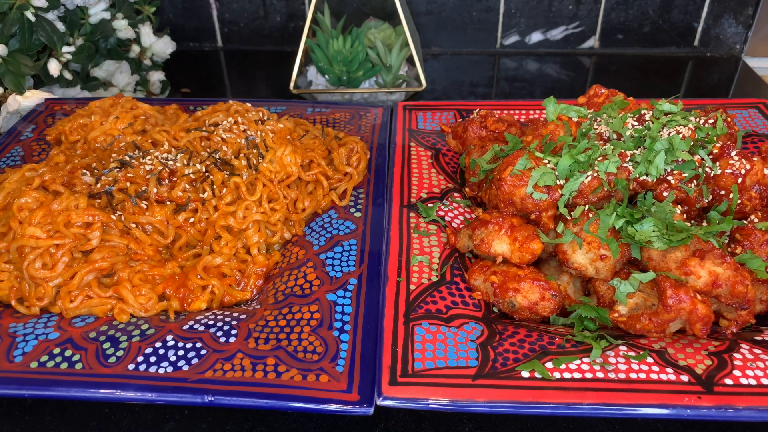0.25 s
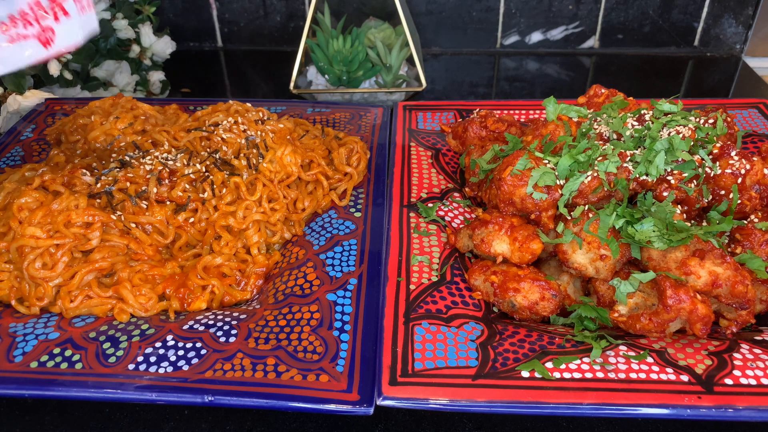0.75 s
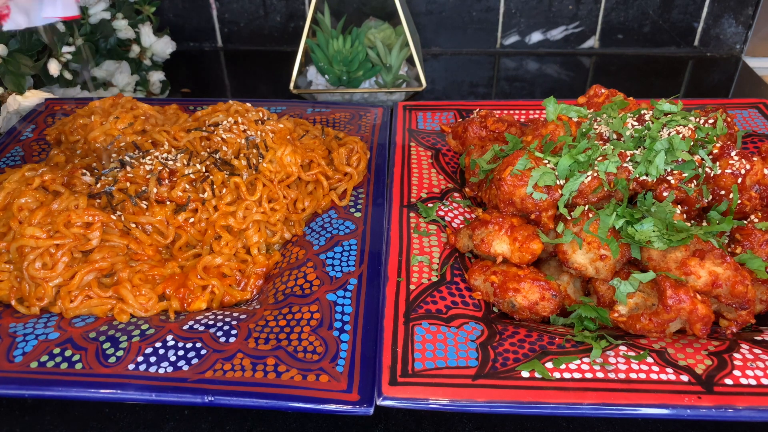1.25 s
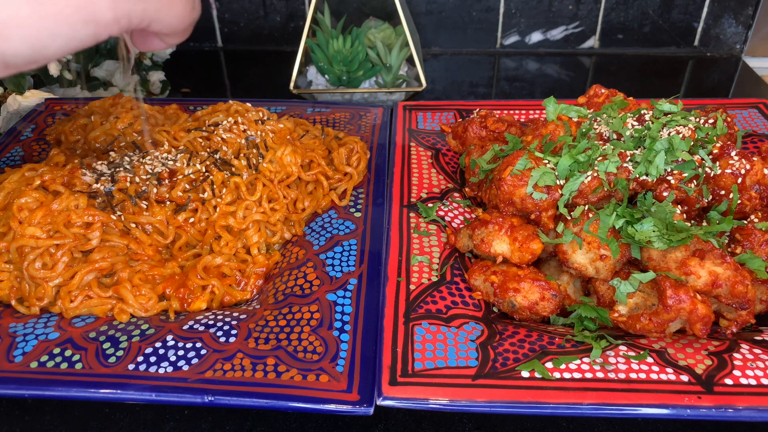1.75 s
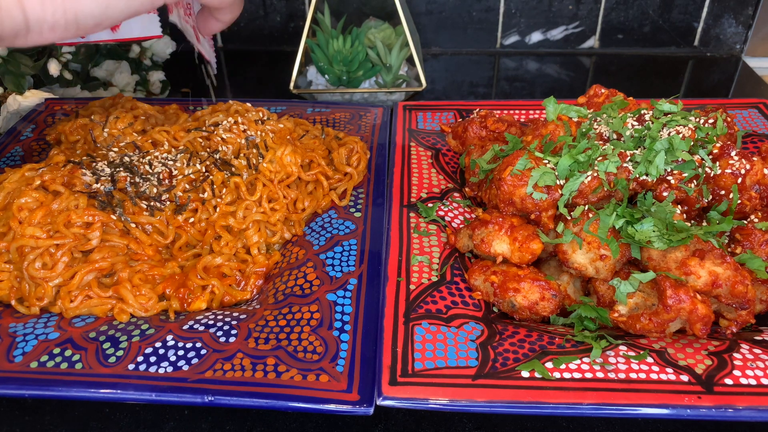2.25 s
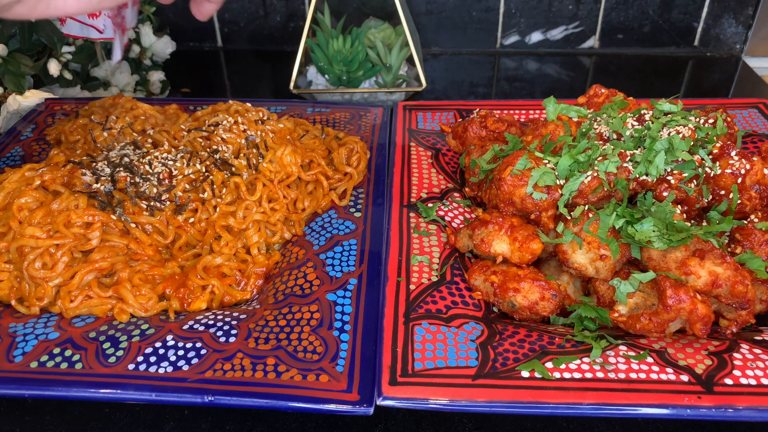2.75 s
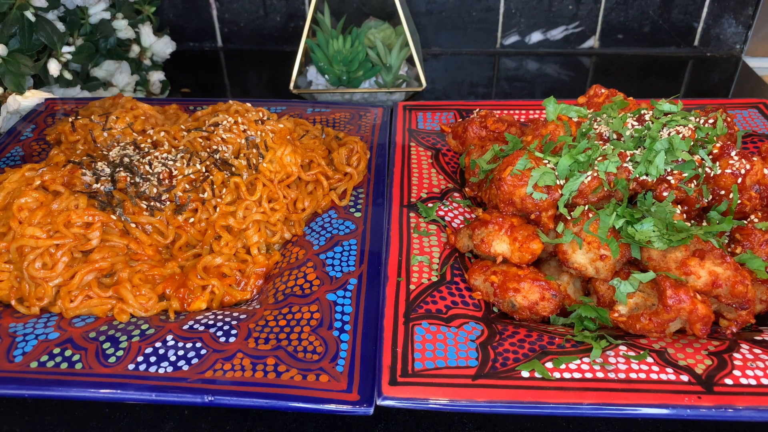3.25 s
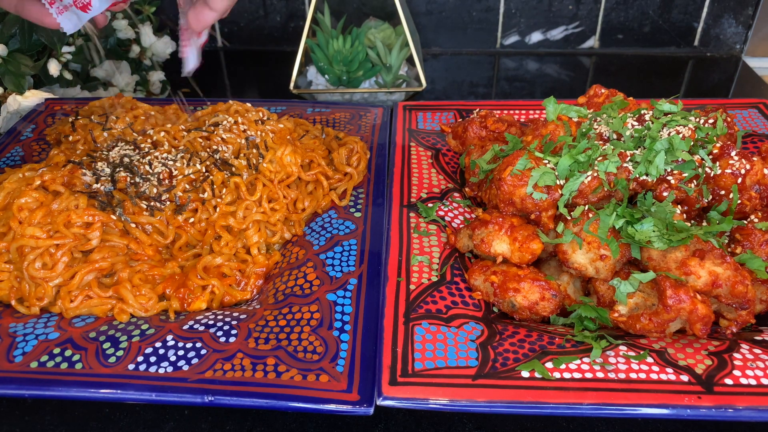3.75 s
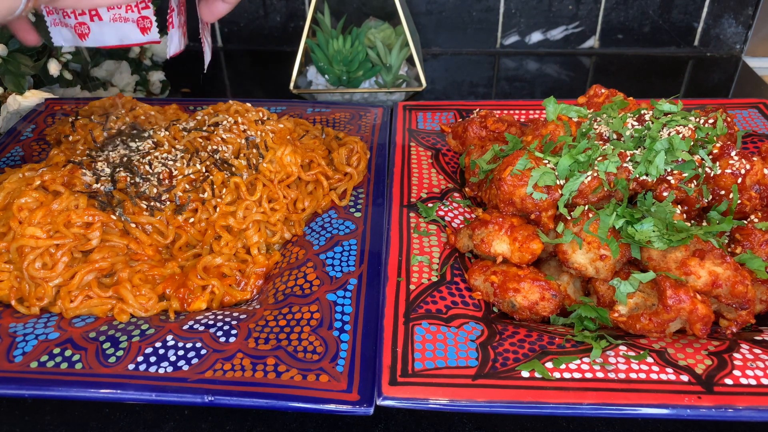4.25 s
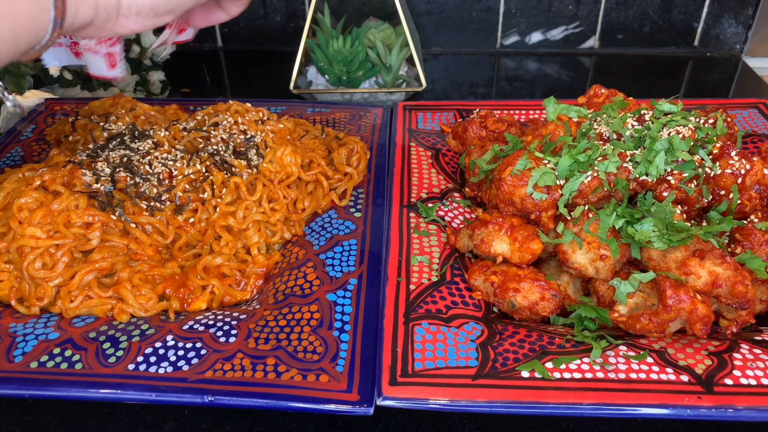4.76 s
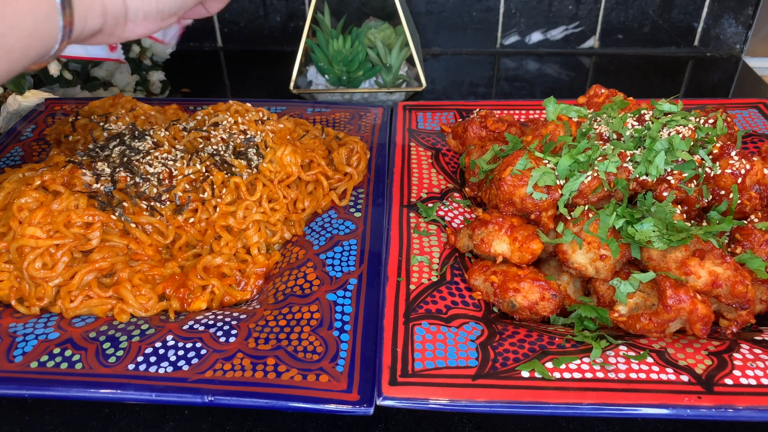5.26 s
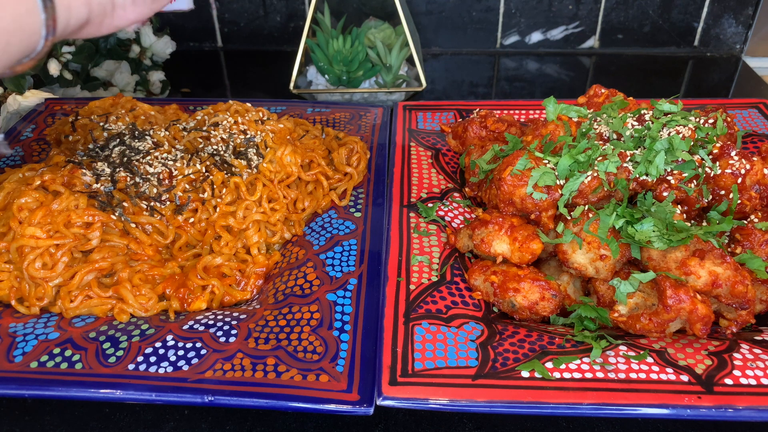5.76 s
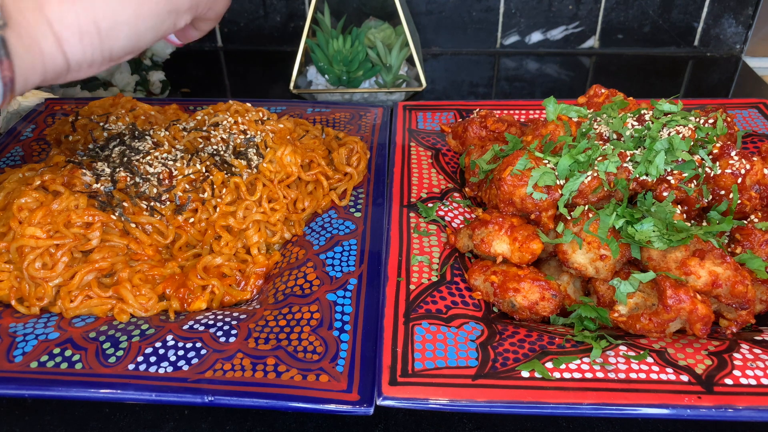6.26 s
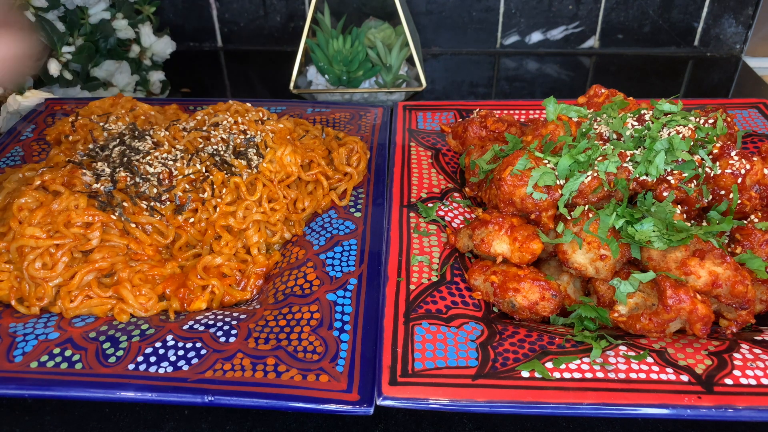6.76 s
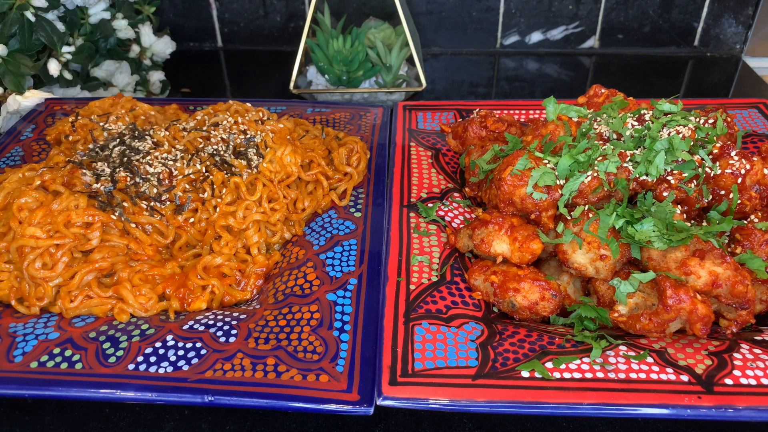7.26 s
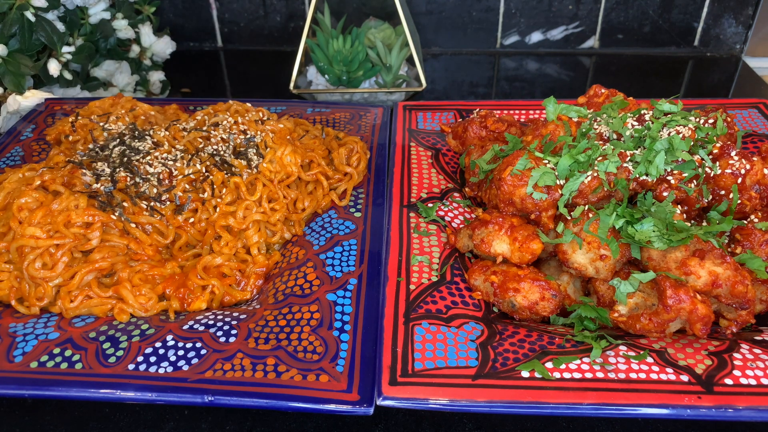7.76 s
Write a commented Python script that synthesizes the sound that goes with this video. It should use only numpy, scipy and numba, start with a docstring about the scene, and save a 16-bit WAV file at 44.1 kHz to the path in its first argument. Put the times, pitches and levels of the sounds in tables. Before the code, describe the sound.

Small plastic seasoning packets are handled close to the microphone in a tiled kitchen, with a short echo and a faint, steady fridge hum. Light crinkles start at about 0.2 seconds, followed by a brighter cluster of crackles around 1.3 seconds. From 1.5 to 3.5 seconds, scattered snaps sit on a soft, fine rustle of seeds and flakes being shaken, with a little palm rubbing. From about 3.8 seconds the squeezes come closer together and louder, in crisp, uneven bursts. The crackling is densest and sharpest between 5.3 and 6.4 seconds, with a few soft hand bumps around 6 seconds. It drops away after 6.5 seconds, then returns in one short crinkle from 7 to 7.2 seconds. A soft, low bump follows near 7.4 seconds, then faint rustling, a tiny plastic squeak and a last snap near 8 seconds.

```python
"""A tiled kitchen: small plastic seasoning packets are squeezed and shaken over the counter, near a two-port
phone. Creases in the film snap over, and each snap excites damped modes in patches of the sheet. Seeds and
small folds tick so densely that they merge into a rustle, with palm rub, soft hand bumps, low thumps under some
snaps and a few faint squeaks. The tiles return a short diffuse reverberation, and a fridge hums under it all."""
import sys
import numpy as np
from scipy import signal
from scipy.fft import rfft, irfft, next_fast_len
from scipy.io import wavfile
from scipy.ndimage import map_coordinates
from numba import njit

SR = 44100
rng = np.random.default_rng(int(sys.argv[2]) if len(sys.argv) > 2 else 0)


def bounce(signal):
    """Save signal as a 16-bit WAV file at the path given by the first command-line argument."""
    frames = np.transpose(np.atleast_2d(signal))
    limited = np.clip(frames, -1, 1)
    pcm = np.round(limited * 32767).astype(np.int16)
    wavfile.write(sys.argv[1], SR, pcm)


N = 352359


def undb(db):
    """Amplitude ratio of a level in decibels."""
    return 10 ** (np.asarray(db) / 20)


def on_log(table, hz):
    """Interpolation of (frequency, value) rows on a logarithmic frequency axis."""
    f, value = np.transpose(table)
    return np.interp(np.log(np.maximum(hz, 1)), np.log(f), value)


def shaped(x, gain):
    """Linear filtering: the spectrum is multiplied by a gain function of frequency."""
    n = next_fast_len(x.shape[-1], True)
    return irfft(rfft(x, n) * gain(np.arange(n // 2 + 1) * SR / n), n)[..., :x.shape[-1]]


def noise(gain):
    """Coloured noise: white Gaussian noise through a linear filter."""
    return shaped(rng.standard_normal(N), gain)


def unit(x):
    """Normalisation to unit RMS."""
    return x / np.sqrt(np.mean(x ** 2))


# Spectrum of the kitchen air: (frequency [Hz], relative spectral density [dB])
AIR_SPECTRUM = [(25, -61), (40, -4), (60, 2.5), (134, 6.5), (200, -3), (317, 0), (531, -16), (900, -19),
                (4250, -33.5), (9000, -49), (13500, -77)]
# Bands of the fridge hum: (centre frequency [Hz], bandwidth [Hz], level [dB])
FRIDGE_BANDS = [(47, 2.2, -66), (152.4, 24, -68)]

def air_and_fridge(air_db=-60.5):
    """Diffuse field: steady air and fridge hum are coherent at the two ports only at long wavelengths."""
    mid = noise(lambda f: undb(on_log(AIR_SPECTRUM, f)))
    side = noise(lambda f: undb(on_log(AIR_SPECTRUM, f)) * np.clip(.24 + f / 1400, 0, 1))
    air = undb(air_db) * (mid + side * np.array([[1], [-1]])) / np.std(mid)
    for hz, width, db in FRIDGE_BANDS:
        air = air + undb(db) * unit(noise(lambda f: 1 / (1 + (2 * (f - hz) / width) ** 2)))
    return air * undb([[-.6], [.6]])


# Reverberation time of the tiled room: (frequency [Hz], T60 [s])
ROOM_T60 = [(500, 0.13), (2000, 0.29), (6000, 0.28), (13000, 0.0073)]

def reverberation(x, wet_db=-13., gap_s=.002):
    """Scattering from tiles and counter gives each port its own tail, decaying exponentially by octave."""
    t = np.arange(SR // 2) / SR
    tail = 0
    for hz in 350 * 2. ** np.arange(6):
        band = shaped(rng.standard_normal((2, len(t))), lambda f: np.exp(-2 * np.log2((f + 1) / hz) ** 2))
        tail = tail + band * 10 ** (-3 * t / on_log(ROOM_T60, hz))
    tail = tail * np.clip(t / gap_s - 1, 0, 1)
    tail = tail / np.sqrt(np.sum(tail ** 2, axis=1, keepdims=True))
    return undb(wet_db) * signal.fftconvolve(x, tail, axes=1)[:, :N]


def ports(x, split_hz=1980., bass_db=2., lead_samples=9, lag_samples=13):
    """Time and level differences: at the left port the bass is early and louder, the treble late."""
    lowpass = lambda f: 1 / (1 + (f / split_hz) ** 4)
    bass = undb(bass_db) * np.roll(shaped(x[0], lowpass), -lead_samples)
    treble = np.roll(shaped(x[0], lambda f: 1 - lowpass(f)), lag_samples)
    return np.array([bass + treble, x[1]])


@njit
def damped_sines(n, start, pole, left, right, length):
    """Superposition of damped sines, each swelling over a cycle, with a complex amplitude per port."""
    out = np.zeros((2, n + 8192))
    for k in range(len(start)):
        phasor, onset_lack = 1 + 0j, 1.
        swell = np.exp(-np.angle(pole[k]) / np.pi)
        for i in range(start[k], start[k] + length[k]):
            out[0, i] += (1 - onset_lack) * (phasor * left[k]).imag
            out[1, i] += (1 - onset_lack) * (phasor * right[k]).imag
            phasor, onset_lack = phasor * pole[k], onset_lack * swell
    return out[:, :n]


# Random phase difference between the ports: (frequency [Hz], standard deviation [rad])
PHASE_SPREAD = [(500, 2.3), (1500, 0.76), (4000, 2.96), (8000, 1.87), (12000, 0.014)]

def modes(when, hz, t60, db, phase_draw):
    """Free vibration: each mode decays exponentially and reaches the left port shifted in phase."""
    when, hz, t60, db, phase_draw = map(np.ravel, np.broadcast_arrays(when, hz, t60, db, phase_draw))
    pole = np.exp(2j * np.pi * hz / SR - np.log(1000) / (t60 * SR))
    right = undb(db) + 0j
    left = right * np.exp(1j * phase_draw * on_log(PHASE_SPREAD, hz))
    start = np.clip(when * SR, 0, N - 1).astype(np.int64)
    length = np.clip(.6 * t60 * SR, 4, 8000).astype(np.int64)
    return damped_sines(N, start, pole, left, right, length)


# Faint squeaks: (centre time [s], half duration [s], frequency [Hz], glide [Hz/s],
# sag at the ends [Hz], nominal level [dB])
SQUEAK_GLIDES = [(.87, .06, 2760, -2600, 0, -68), (3.15, .13, 2890, 0, 450, -70),
                 (7.93, .09, 1630, 0, 60, -63)]

def squeaks():
    """Amplitude modulation by slow noise roughens tones that swell and fade as they glide or arch."""
    t, out = np.arange(N) / SR, 0
    for centre, half_s, hz, glide, sag, db in SQUEAK_GLIDES:
        progress = np.clip((t - centre) / half_s, -2, 2)
        roughness = 1.2 + .5 * unit(noise(lambda f: 1 / (1 + (f / 70) ** 2)))
        pitch = hz + glide * half_s * progress - sag * progress ** 2
        tone = np.sin(2 * np.pi * np.cumsum(pitch) / SR)
        out = out + undb(db) * np.exp(-progress ** 4) * roughness * tone
    return out


# Soft bumps of the hand, and low thumps under some snaps: (time [s], level before the low-pass [dB],
# fundamental [Hz], T60 [s])
SOFT_BUMPS = [(.257, -49, 520, 0.033), (5.864, -38, 279, 0.057), (6.097, -43.5, 257, 0.096),
              (6.216, -39, 520, 0.027), (6.276, -44, 564, .025), (7.39, -47, 135.3, 0.29)]

def soft_bumps(corner_hz=700):
    """A soft impact acts as a low-pass on what it excites: a low mode and three shorter overtones."""
    when, db, hz, t60 = np.transpose(SOFT_BUMPS)[:, :, None]
    ratio, partial_db = np.array([1, 1.9, 3.4, 5.8]), np.array([0, 0, 1, 5])
    ringing = modes(when, hz * ratio, t60 / ratio, db + partial_db, phase_draw=0)
    return shaped(ringing, lambda f: 1 / (1 + 1j * f / corner_hz) ** 2)


def palm_rub(dull_gain, db=-64, at_rustle_db=-55, follow=.79, flicker_db=2.5, centre_hz=370):
    """Friction noise of the palm: a broad, uneven band that grows as a power of the dull rustle."""
    band = unit(noise(lambda f: 1 / np.hypot(1, f / centre_hz - centre_hz / (f + 1))))
    flicker = np.interp(np.arange(N) / SR, np.arange(200) * .04, rng.standard_normal(200))
    return undb(db + flicker_db * flicker) * (dull_gain / undb(at_rustle_db)) ** follow * band


def bending_resonances(x, depth_db=4., width_hz=300, life_s=.035):
    """Time-varying filter: resonances of the film come and go at random frequencies as it bends."""
    f, t, spectrum = signal.stft(x, SR, nperseg=512)
    field = rng.standard_normal((int(SR / 2 / width_hz) + 2, int(N / SR / life_s) + 2))
    grid = np.meshgrid(f / width_hz, t / life_s, indexing="ij")
    gain_db = depth_db * map_coordinates(field, grid, order=1)
    return signal.istft(spectrum * undb(gain_db), SR, nperseg=512)[1][:, :N]


# Radiation spectrum of the film: (frequency [Hz], relative spectral density [dB])
FILM_SPECTRUM = [(180, -39), (300, -11), (5740, -1), (7760, 1), (13300, 1), (16500, -23)]

def seed_ticks(per_s=500., mode_count=10, scatter_db=2.8, t60=.007):
    """Shot noise: seeds and small folds strike the film at random, each exciting a cluster of modes."""
    ticks = int(per_s * N / SR)
    shape = (ticks, mode_count)
    hz = 400 + 15600 * rng.random(shape) ** 1.187
    when = rng.random((ticks, 1)) * N / SR + .001 * rng.random(shape)
    strength_db = -scatter_db * np.log(rng.random((ticks, 1)) + .0029)  # many weak, few strong
    db = on_log(FILM_SPECTRUM, hz) + strength_db
    return unit(modes(when, hz, t60 * (6000 / hz) ** .031, db, rng.standard_normal(shape)))


def film_hiss():
    """The finest ticks merge into Gaussian noise, partly coherent between the ports."""
    common_share = lambda f: np.exp(-on_log(PHASE_SPREAD, f) ** 2 / 4)
    common = noise(common_share)
    separate = shaped(rng.standard_normal((2, N)), lambda f: np.sqrt(1 - common_share(f) ** 2))
    return unit(shaped(common + separate, lambda f: undb(on_log(FILM_SPECTRUM, f))))


# Squeezes and shakes: (time [s], hold [s], bright rustle level [dB], rise over 20 dB [s],
# fall over 20 dB [s], dull rustle relative to bright [dB])
SQUEEZE_GESTURES = [(.05, 0.07, -74, 0.82, 0.11, 4), (.2, 0.098, -61, 0.15, 0.27, -3),
                    (.43, 0.013, -55, 0.025, 0.12, -4.5), (.58, 0.018, -62, 0.06, 0.12, -4),
                    (.69, 0.059, -59.5, 0.11, 0.13, -7.5), (.81, 0.061, -62, .1, 0.093, 0.5),
                    (.9, 0.22, -74, 0.057, 0.07, 8.5), (1.169, 0.094, -54, 0.025, 0.083, 0),
                    (1.314, 0.0086, -36, 0.022, 0.03, -15), (1.36, 0.1, -50.5, 0.055, 0.51, -4.5),
                    (1.7, 0.087, -68, 0.049, 0.96, -2), (1.9, 0.011, -57, 0.22, 0.66, -8),
                    (2.24, 0.052, -66, 0.097, 0.29, 2), (2.35, 0.029, -57.5, 0.055, 0.079, -17),
                    (2.43, 0.037, -57.5, 0.17, 0.47, 0.5), (2.66, 0.11, -56, 0.071, 0.35, -1),
                    (2.92, 0.085, -54.5, 0.12, 0.14, -3), (3.379, 0.093, -51.5, 0.29, 0.14, -5),
                    (3.71, 0.34, -52, 0.14, 0.37, -6.5), (4.17, 0.037, -57, 0.069, 0.35, -7.5),
                    (4.54, 0.0072, -44.5, 0.069, 0.11, -5), (4.6, 0.063, -53, .05, .1, -4.5),
                    (4.7, 0.059, -47, 0.057, 0.085, -3), (4.85, 0.063, -47.5, 0.061, 0.1, -2.5),
                    (5.07, 0.023, -51, 0.19, 0.35, 1), (5.41, 0.029, -45.5, 0.14, 0.12, -5),
                    (5.47, 0.032, -58, 0.075, 0.08, 4), (5.56, 0.04, -47.5, 0.11, 0.11, -6.5),
                    (5.66, 0.31, -47.5, .1, 0.31, -5.5), (6.09, 0.059, -37, 0.037, 0.04, -8),
                    (6.225, 0.009, -40.5, 0.068, 0.029, -11.5), (6.3, 0.012, -39, 0.1, 0.089, -9.5),
                    (6.44, 0.045, -54, 0.49, 0.13, -0.5), (6.67, .02, -60.5, 0.19, 0.19, -3),
                    (6.82, 0.029, -70, 0.12, 0.38, 8), (7.014, 0.011, -52.5, 0.049, 0.1, -3),
                    (7.099, 0.14, -51, 0.057, 0.084, -5), (7.25, 0.082, -68.5, 0.06, 0.5, 8),
                    (7.385, 0.0097, -64, 0.065, 0.089, 1.5), (7.51, 0.013, -58, 0.071, 0.22, 3.5),
                    (7.72, 0.086, -67.5, 0.22, 0.12, -3), (7.88, 0.065, -78, 0.14, .05, 15),
                    (7.97, 0.018, -62.5, 0.043, .1, 11.5)]

def squeeze_envelopes(after_db=-26, after_t60=.1, hop=88):
    """Incoherent sources add in power: squeezes and each snap's after-rustle set bright and dull gains."""
    t = np.arange(N // hop + 1) * hop / SR
    snap_s, snap_db = np.transpose(CREASE_SNAPS)[:2]
    kicks = np.zeros(len(t))
    np.add.at(kicks, (snap_s * SR / hop).astype(int), undb(snap_db + after_db) ** 2)
    after_power = signal.lfilter([1], [1, -undb(-60 * t[1] / after_t60) ** 2], kicks)
    start, hold, db, rise, fall, dull_db = np.transpose(SQUEEZE_GESTURES)[:, :, None]
    fade_db = 20 * np.maximum((start - t) / rise, (t - start - hold) / fall).clip(min=0)
    power = undb(db - fade_db) ** 2
    bright = np.sqrt(power.sum(axis=0) + after_power)
    dull = np.sqrt((power * undb(dull_db) ** 2).sum(axis=0) + after_power)
    return [np.interp(np.arange(N) / SR, t, gain) for gain in (bright, dull)]


def rustle(bright_gain, dull_gain, tick_db=-2.5, hiss_db=-4.5, split_hz=3700):
    """Larger radiators sound lower: broad folds fill the band below the split, seeds the band above."""
    texture = bending_resonances(undb(tick_db) * seed_ticks() + undb(hiss_db) * film_hiss())
    folds = shaped(texture, lambda f: 1 / (1 + (f / split_hz) ** 4) / (1 + (600 / (f + 1)) ** 4))
    seeds = shaped(texture, lambda f: 1 / (1 + (split_hz / (f + 1)) ** 4))
    return bright_gain * unit(seeds) + dull_gain * unit(folds)


# Spectral envelope of a snap: (frequency [Hz], weight of the 2.2 kHz share [1],
# weight of the 4.5 kHz share [1], offset [dB])
SNAP_COLOUR = [(494, 2.12, 0.11, 1.5), (1000, 2, 0.049, 7), (2120, 0.98, 0.44, 7.5),
               (3960, 0.12, 0.96, 8.5), (8130, -0.0831, 0.066, -5), (13800, -0.07, 0, -4)]

def crease_colour(shares_db, hz, chance_db=3.5):
    """Spectral envelope in dB at each crease's modes: broad creases sound fuller; the low end scatters."""
    knot_hz, *weights, offset_db = np.transpose(SNAP_COLOUR)
    scatter_db = chance_db * rng.standard_normal((len(hz), len(knot_hz))) * (knot_hz < 1500)
    knot_db = shares_db @ weights + offset_db + scatter_db
    colour_db = np.array([on_log(np.transpose([knot_hz, db]), f) for db, f in zip(knot_db, hz)])
    return colour_db + np.where(hz > 8000, on_log(FILM_SPECTRUM, hz), 0)


def avalanche(snaps, count=90, patch_db=-7, scatter_db=3., step_s=.00044, settle_s=.0025, settle_db=-6.5):
    """A crease gives way in an avalanche of steps, each exciting a mode of another patch of film."""
    start, peak_db, fullness_db = snaps.T[:3, :, None]
    shape = (len(snaps), count)
    hz = 500 + 15800 * ((np.arange(count) + rng.random(shape)) / count) ** 1.1825
    # a long plus a short waiting time: the avalanche swells fast and dies more slowly
    wait = rng.exponential(1.3, shape) + rng.exponential(.3, shape)
    pace_s = step_s * undb(.35 * (np.maximum(fullness_db, -30) + 25))  # thin, bright creases go faster
    settles = np.arange(count) % 2 == 1  # every second patch is a later, softer crunch
    when = start + wait * np.where(settles, settle_s, pace_s)
    t60 = .005 * (6000 / hz) ** .7 * rng.uniform(.5, 1.5, shape)  # larger patches ring lower and longer
    db = peak_db + patch_db + crease_colour(snaps[:, 2:4], hz) + settles * settle_db
    return modes(when, hz, t60, db + rng.normal(0, scatter_db, shape), rng.standard_normal(shape))


def largest_patches(snaps, ring_cycles=30, detune=.035):
    """Mode splitting: the largest patch freed by each crease rings on as a close pair of modes."""
    start, peak_db, _, _, centre_hz, ring_db = snaps.T[:, :, None]
    hz = centre_hz * rng.normal(1, detune, (len(snaps), 2))
    t60 = np.minimum(ring_cycles / hz, .012)
    when = start + .0006 * np.arange(2)
    return modes(when, hz, t60, peak_db + ring_db - 2.5, rng.standard_normal(hz.shape))


# The loudest snapping creases: (time [s], nominal treble peak [dB], share at 2.2 kHz [dB],
# share at 4.5 kHz [dB], frequency of the largest patch [Hz], its ring relative to the peak [dB])
CREASE_SNAPS = [(0.196, -35.5, -12, -17, 2570, -3), (0.255, -31.5, -12.5, -15, 5280, -14.0),
                (0.295, -27.5, -39, -16, 4930, -12), (0.412, -36, -15.5, -16, 7150, -1),
                (0.4244, -34.5, -18, -12, 6840, -5), (0.443, -29.5, -16.5, -25, 2470, -12),
                (0.5744, -32, -18.5, -13, 7000, -18), (0.602, -48, -8, -10, 2860, -1),
                (0.669, -42, -19, -10, 1850, -16.5), (0.6905, -28, -55, -24, 3380, -28),
                (0.7914, -29.5, -38.5, -14, 6440, 6), (1.161, -30, -7, -17, 2580, -16),
                (1.175, -36, -17, -16, 4800, -10), (1.1856, -34.5, -10, -20, 4690, -8),
                (1.263, -28, -27, -7, 2660, -13), (1.2995, -30, -10, -7, 4520, -1),
                (1.31, -29, -16, -14, 3240, 1), (1.3188, -26.5, -15.5, -16, 4640, -3),
                (1.3259, -26.5, -15.5, -6, 2580, -13), (1.382, -34, -14, -13, 3250, -10),
                (1.401, -24, -28.0, -39, 4440, -7), (1.437, -32, -20, -18.0, 5960, -15),
                (1.492, -35.5, -21, -11, 5880, -10), (1.5893, -32.5, -12, -10.5, 4220, -11.5),
                (1.726, -33.5, -18, -6, 2960, -5), (1.759, -38, -16, -7, 4180, -2),
                (1.7721, -31.0, -14.5, -12.5, 3960, -12), (1.881, -48, -20, -4, 3600, 1),
                (2.237, -39.5, -4, -10, 3880, -6), (2.2768, -39.5, -11.5, -15, 1820, -8),
                (2.4241, -29.5, -14, -14, 3140, -14), (2.4736, -37, -28.5, -17, 3160, -7),
                (2.5248, -43, -14, -3, 5680, -10), (2.5636, -30.5, -10, -15, 6000, -4),
                (2.6457, -33.5, -9, -19, 3040, -3), (2.669, -34, -18, -14, 5040, -19),
                (2.686, -43, -12, -13, 2800, -6), (2.7098, -20.5, -30, -31, 1830, -24),
                (2.76, -37, -19.5, -10, 3360, -14), (2.7993, -28, -26, -12, 5300, -15),
                (2.886, -47, -12, -4, 7110, -13.0), (2.9344, -35.5, -30, -18, 3200, -7),
                (3.193, -37, -27, -6, 2700, -6), (3.4086, -19.5, -40, -28, 5750, -21.5),
                (3.431, -30.5, -26, -7, 3900, -3), (3.7706, -33, -22, -17, 3360, -5.5),
                (3.8386, -34, -17, -17.5, 6870, -12), (3.8584, -23, -19, -6.5, 6830, 5),
                (3.907, -25.5, -27.5, -15, 3340, -20), (3.937, -25, -28, -12, 5120, -20),
                (3.9517, -27.5, -21, -8, 5430, -1), (3.98, -20, -19.0, -7, 4120, 3.5),
                (4.163, -19.5, -16, -27, 1810, -8), (4.2112, -33.5, -16, -29, 1850, -6),
                (4.4238, -44.5, -65, -31, 1270, -24), (4.487, -31, -11, -12, 2040, -18),
                (4.52, -29.5, -26, -9, 1050, -9), (4.5433, -25, -52, -7.5, 1180, -8.5),
                (4.589, -19.5, -79, -15.5, 4920, -1), (4.667, -33, -16, -19, 3470, -13.0),
                (4.7004, -22.5, -39, -14, 6100, -30), (4.712, -32, -25, -19, 6010, -9.0),
                (4.7368, -30, -13, -13, 1030, -4), (4.762, -31.0, -31, -17.5, 1310, -15),
                (4.786, -27.5, -35, -20, 4750, -12), (4.8397, -15.5, -21.5, -22, 6160, -3),
                (4.861, -25, -29, -22, 3700, -14), (4.878, -22.5, -26.5, -1, 6840, -16),
                (4.9067, -25.5, -25, -13, 4300, 3), (4.936, -20.0, -49, -23, 4370, -20),
                (5.0682, -31, -15, -8.5, 4900, -2), (5.09, -23, -27.5, -16.5, 4400, -17),
                (5.1104, -33.5, -14.5, -7, 2780, -15), (5.127, -29, -12.5, -12, 4030, -14.0),
                (5.198, -31.5, -29, -15, 2130, -28), (5.209, -33.5, -6.5, -17, 2080, 0),
                (5.229, -34, -28, -14, 5150, -13), (5.3258, -28.5, -14, -18, 3250, -2),
                (5.335, -30, -13.5, -10, 6960, -2), (5.3505, -20, -11.5, -16, 6900, -20),
                (5.382, -23, -34.0, -15, 4610, -16), (5.399, -18.5, -44, -22, 1530, -35),
                (5.412, -17.5, -42, -21, 2920, -15), (5.416, -25, -24, -18, 5040, -10.0),
                (5.4285, -33, -32, -2, 4540, -9.0), (5.4465, -25.5, -23, -9, 4260, -16),
                (5.4504, -20, -10, -32, 1880, -21), (5.4856, -26.5, -30, -15, 6550, -6),
                (5.506, -27.5, -10.5, -17.5, 3080, -14), (5.5478, -34, -16, -10, 1150, -24),
                (5.574, -17, -22.5, -35, 2730, -12), (5.587, -17.5, -21, -17.5, 1660, -32),
                (5.612, -24.5, -16.5, -8, 7130, -11), (5.625, -21.5, -40, -16, 6900, -14),
                (5.679, -22, -20.5, -14, 3200, -5.5), (5.688, -22.5, -19, -13, 4030, -15.5),
                (5.699, -29, -27, -4, 1830, -14), (5.716, -27.5, -14.5, -18, 2130, -9),
                (5.7358, -21.5, -19, -20.5, 1150, -22), (5.7648, -22.5, -30, -14, 4930, 1),
                (5.8014, -25.0, -23.5, -25, 1080, -21), (5.828, -23, -22.5, -11, 4960, -6),
                (5.8357, -22, -15, -15, 7040, -12), (5.8623, -21.5, -15.5, -14, 2070, -18),
                (5.9004, -30, -19.5, -9, 4690, -18), (5.9335, -33, -14, -5, 3360, -13),
                (5.9434, -15, -20.5, -16.5, 5250, -23), (6.002, -37, -22, -6, 4760, -2),
                (6.038, -26.5, -17, -7, 4600, -8.0), (6.0676, -26, -13.5, -26, 3020, -8),
                (6.075, -27, -26, -23, 4890, -7), (6.0858, -12.5, -53, -19, 5030, -25),
                (6.1024, -21.5, -35, -7, 3120, -22), (6.1345, -26, -28, -3, 4900, -8.0),
                (6.1455, -27, -25, -12, 3900, -10), (6.152, -20, -37, -8, 4950, -13.0),
                (6.2, -29, -43.0, -10, 2670, -13), (6.2159, -14, -28, -16, 4870, -6),
                (6.2392, -18.5, -39, -21, 3040, -22), (6.274, -17.5, -28.5, -19, 3750, -12),
                (6.2912, -19.5, -39.0, -15, 6680, -13), (6.3, -28, -27.5, -20, 4020, -13.5),
                (6.3154, -22, -34, -20, 2930, -19), (6.3506, -24, -15.5, -15, 960, -13),
                (6.3615, -25.5, -16, -26, 4670, -6), (6.4441, -23, -46, -12, 7000, -13.5),
                (6.455, -35, -23, -14, 3500, -5), (6.487, -26, -27.5, -11, 4940, -4),
                (6.659, -34, -29, -33, 4140, -14), (6.8075, -36.5, -26.5, -29, 5700, -9),
                (7.015, -28, -16.5, -35, 2370, -18), (7.0222, -31, -18.5, -29, 2450, -14),
                (7.0916, -26.5, -40, -14, 2700, -19), (7.136, -28.5, -39, -20, 2500, -26),
                (7.158, -30, -36, -11, 4350, -14.5), (7.1748, -25, -26.5, -19, 2610, -26),
                (7.1969, -25, -16.5, -18.5, 6890, -5), (7.2163, -22, -18.5, -22, 1800, -9),
                (7.5, -47.5, -5, 0, 2190, 8), (7.978, -29, -24, -16, 4870, -14)]

def crease_snaps(cutoff_hz=350.):
    """Snap-through buckling sets the film ringing; the snaps carry little below a few hundred hertz."""
    snaps = np.array(CREASE_SNAPS)
    ringing = avalanche(snaps) + largest_patches(snaps)
    return signal.sosfilt(signal.butter(2, cutoff_hz, "high", fs=SR, output="sos"), ringing)


def scene():
    """Superposition of the kitchen's background, the reverberant field and the packets' direct sound."""
    bright_gain, dull_gain = squeeze_envelopes()
    packets = squeaks() + soft_bumps() + palm_rub(dull_gain)
    packets = packets + rustle(bright_gain, dull_gain) + crease_snaps()
    return air_and_fridge() + reverberation(packets) + ports(packets)


def record(dry, low_hz=38., top_hz=16450):
    """Band limiting: the phone drops the deepest bass and cuts the top steeply."""
    dry = signal.sosfilt(signal.butter(4, low_hz, "high", fs=SR, output="sos"), dry)
    return signal.sosfilt(signal.ellip(10, .2, 80, top_hz, fs=SR, output="sos"), dry)


dry = scene()
out = record(dry)
bounce(out)
```